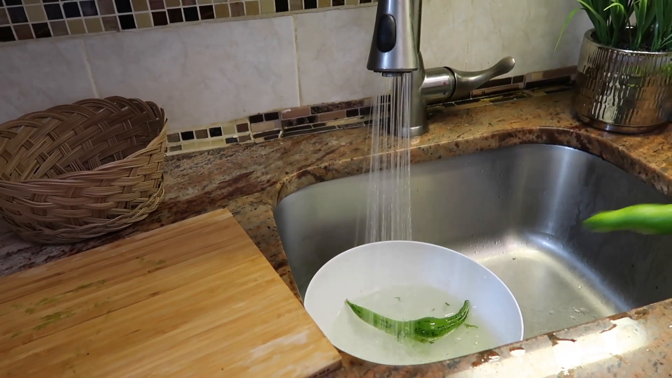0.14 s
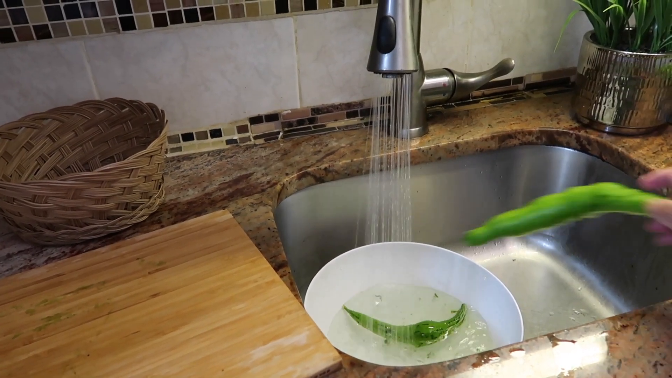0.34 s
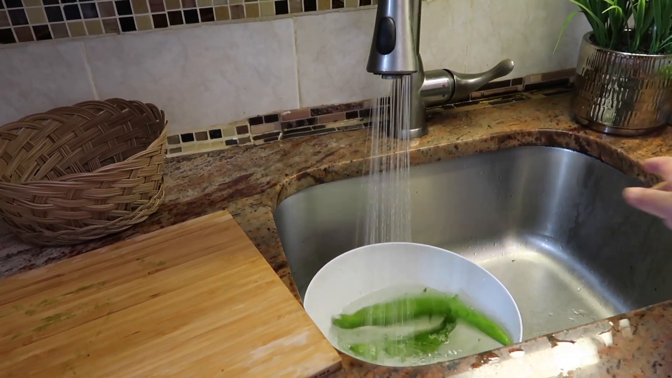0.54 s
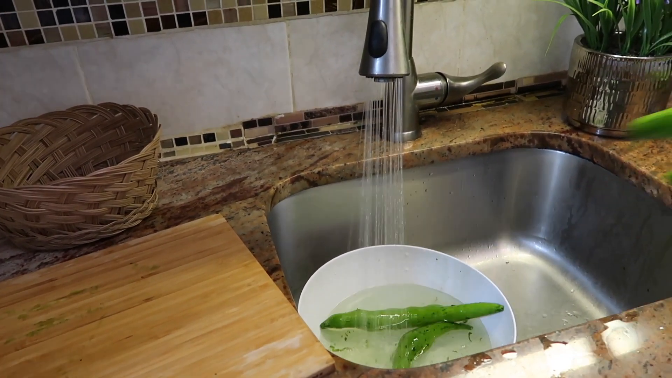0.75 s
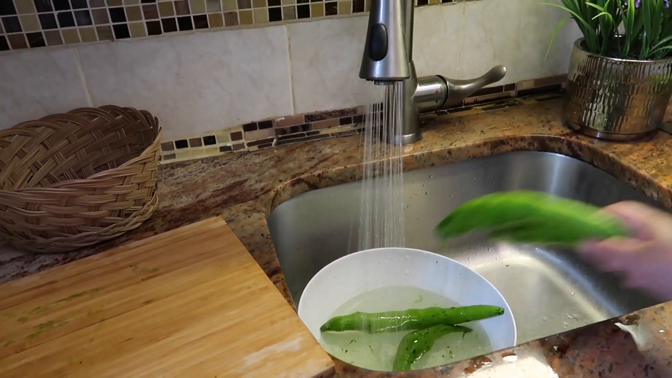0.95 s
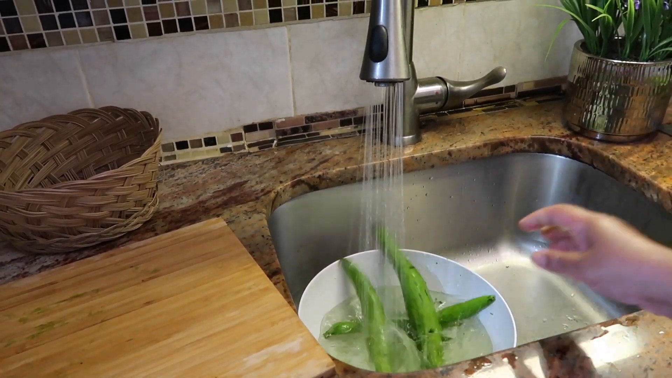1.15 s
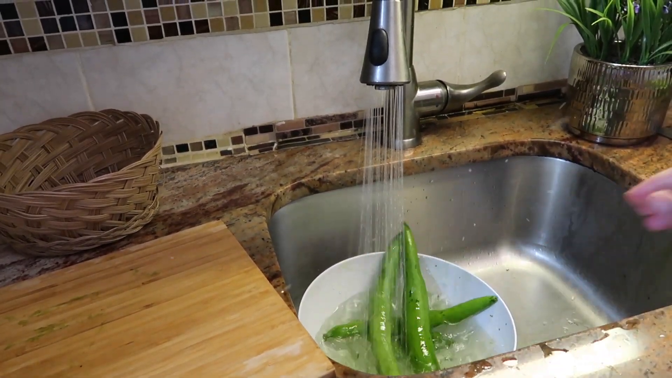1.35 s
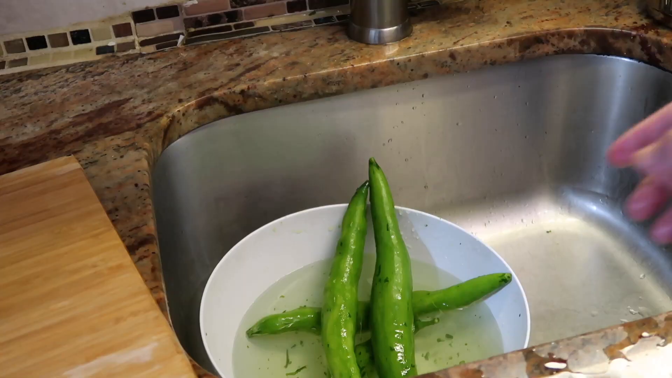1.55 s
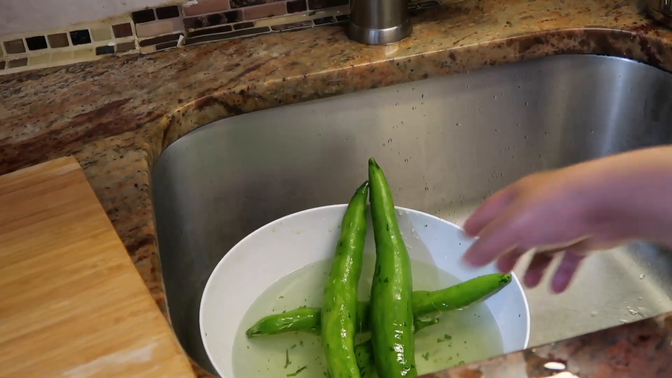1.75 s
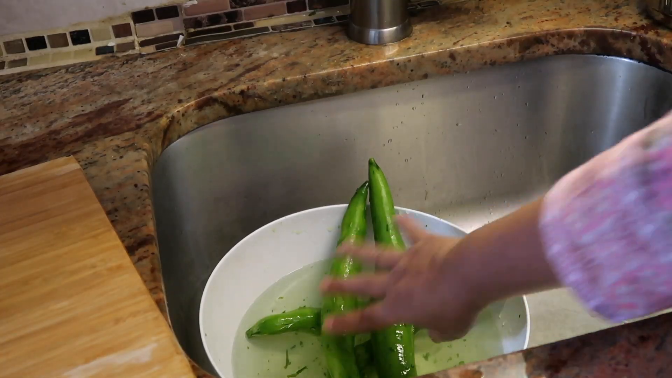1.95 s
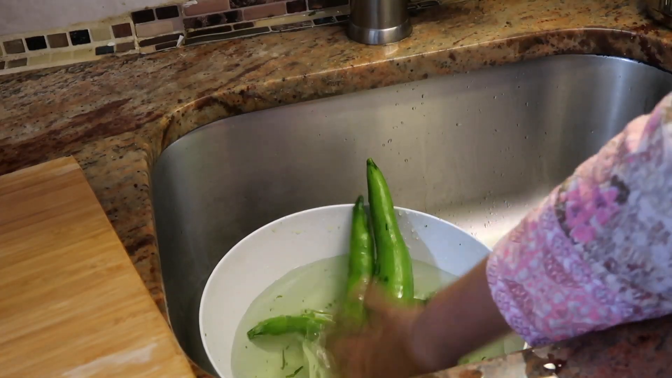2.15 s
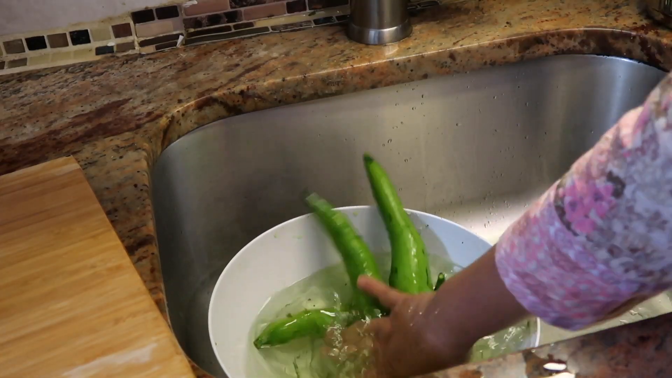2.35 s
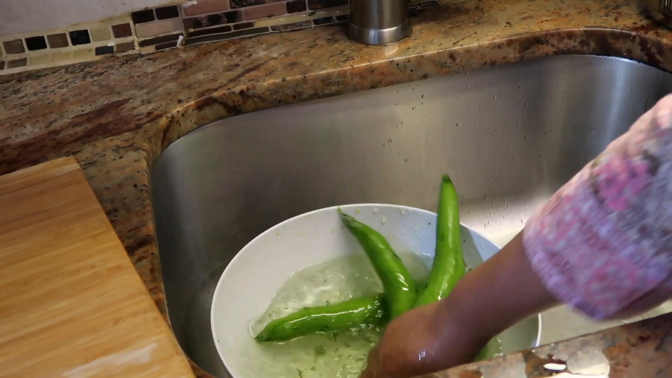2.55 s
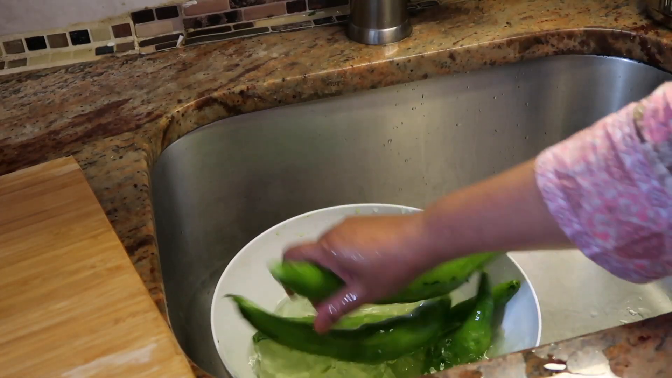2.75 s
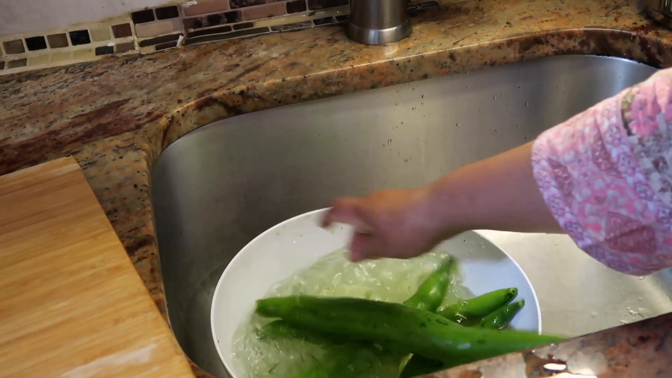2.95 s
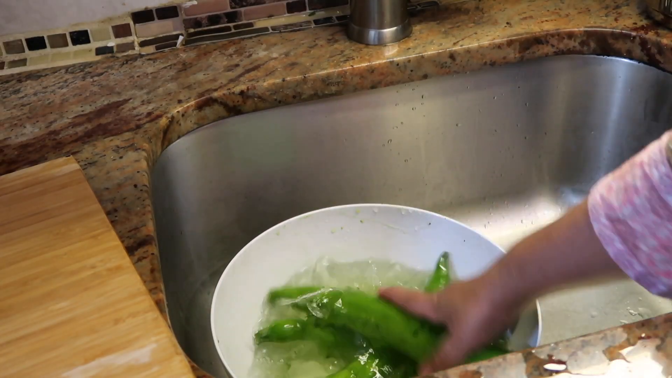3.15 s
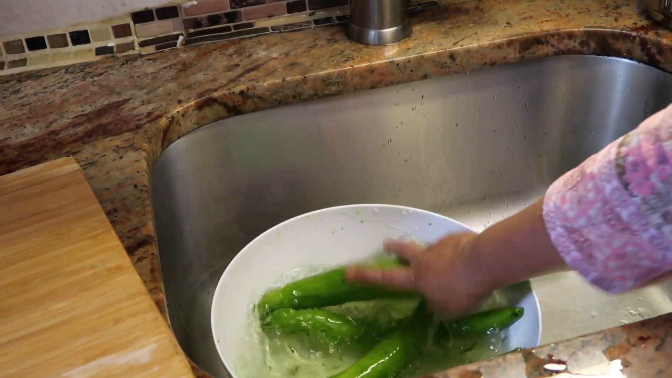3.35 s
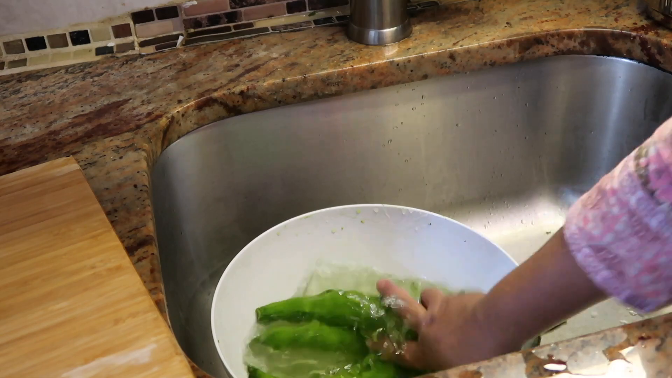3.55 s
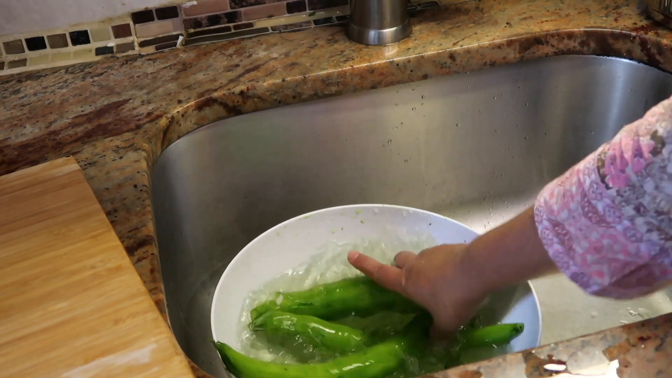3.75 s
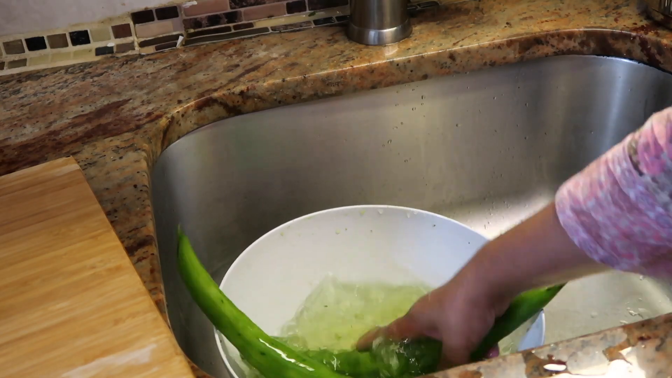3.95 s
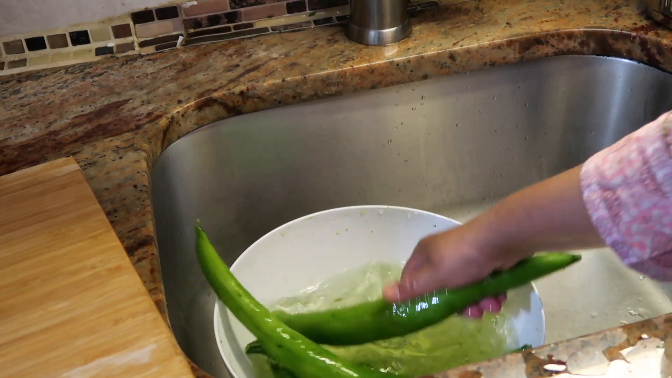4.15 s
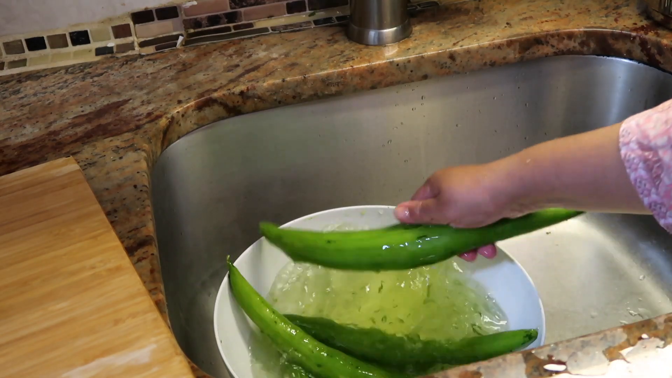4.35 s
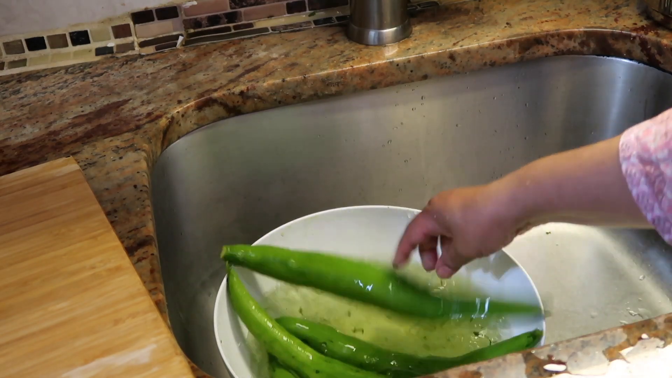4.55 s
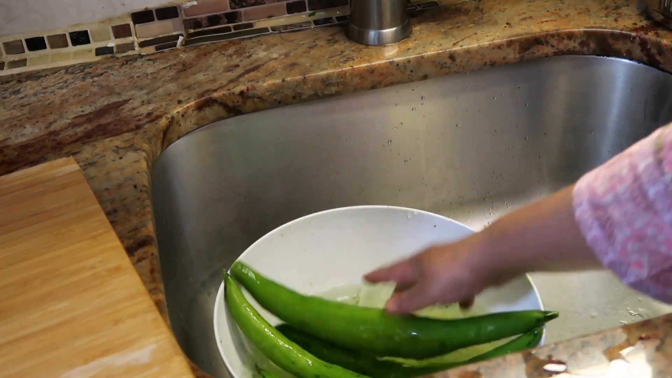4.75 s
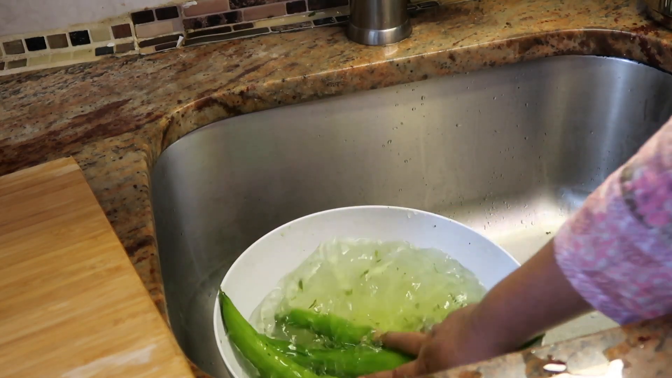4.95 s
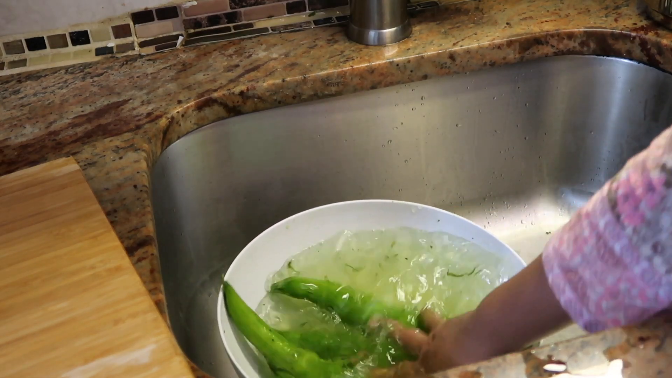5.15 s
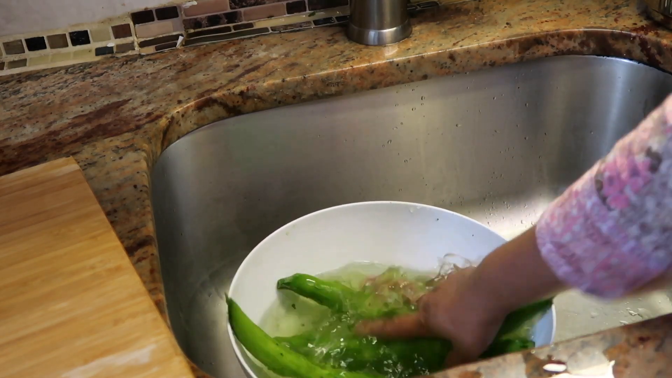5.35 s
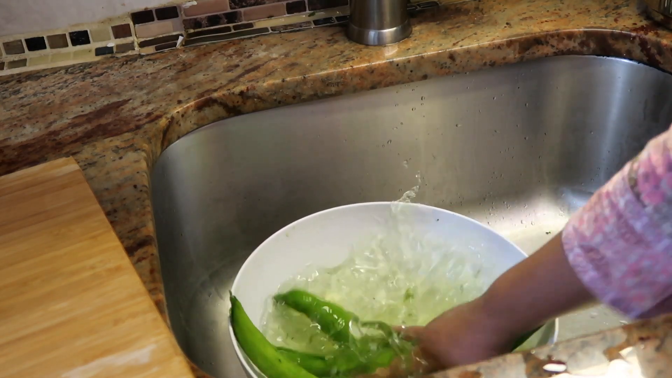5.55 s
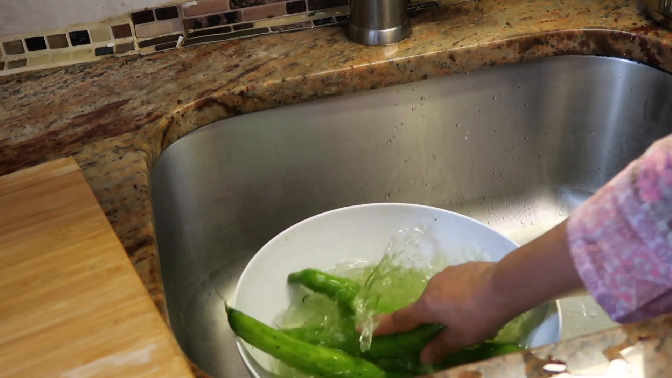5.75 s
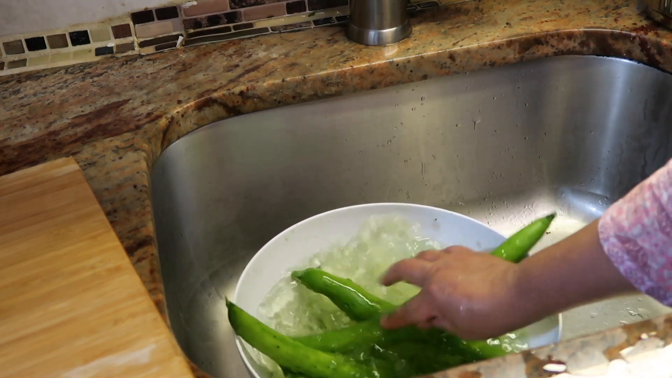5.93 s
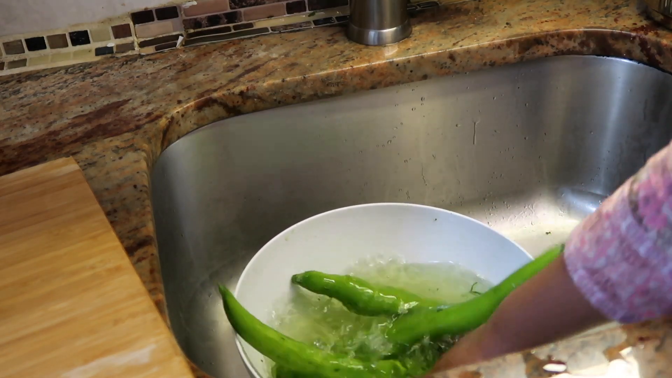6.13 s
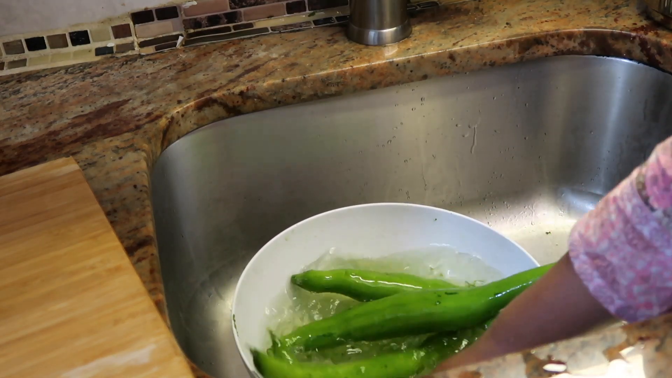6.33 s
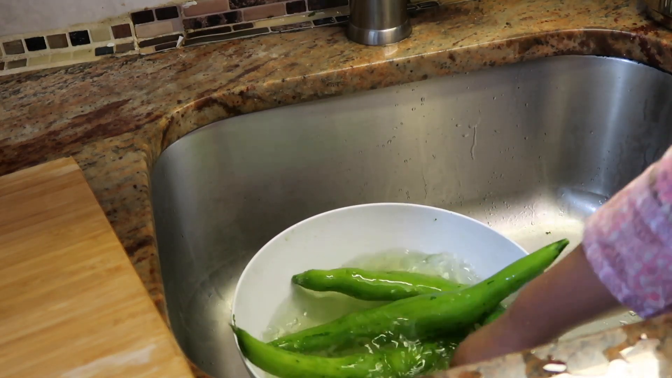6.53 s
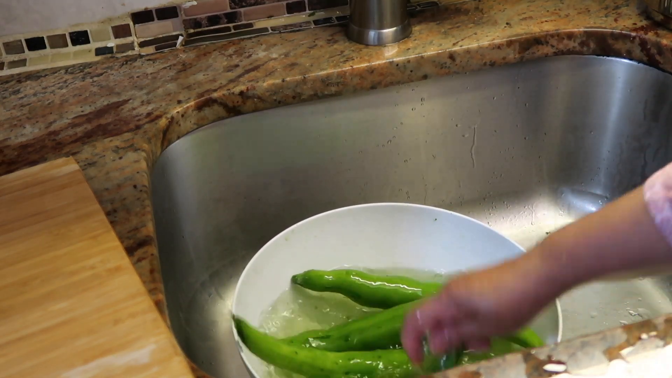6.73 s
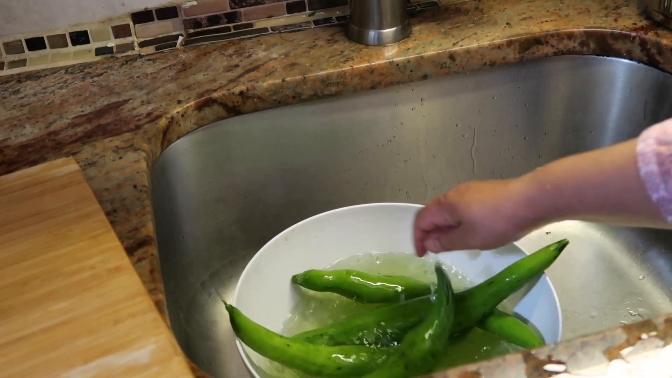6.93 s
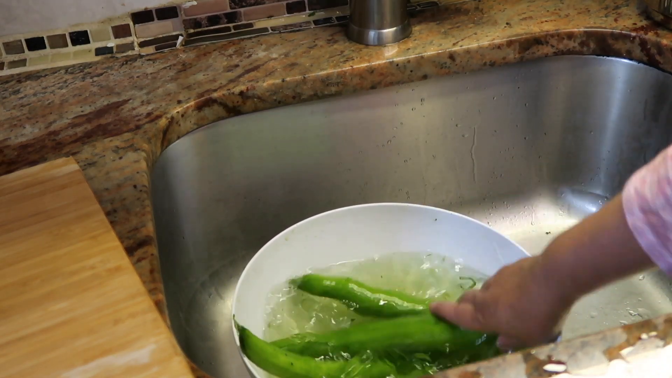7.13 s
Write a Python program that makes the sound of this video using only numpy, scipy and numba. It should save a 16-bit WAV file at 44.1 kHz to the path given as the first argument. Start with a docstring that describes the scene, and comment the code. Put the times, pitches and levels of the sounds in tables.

```python
"""At a steel kitchen sink, a tap sprays into a bowl, peppers are tossed in, then a hand swishes them about. The
spray is a hiss full of tiny drops and keeps the bowl humming; at about 1.5 s the level dips, and after that the
spray is no longer heard. Trapped air bubbles ring and rise in pitch: big ones plop, swarms of small ones gurgle
and fizz. Water slaps, the bowl and peppers bump the sink, and the basin echoes over a faint room noise. The
sound fades in, and its level dips briefly twice in the first two seconds."""
import sys
import numpy as np
from scipy import signal
from scipy.fft import rfft, irfft, next_fast_len
from scipy.io import wavfile
from scipy.ndimage import uniform_filter1d
from numba import njit

SR = 44100
rng = np.random.default_rng(int(sys.argv[2]) if len(sys.argv) > 2 else 0)


def int16_out(signal):
    """Quantize to a 16-bit WAV file."""
    q = np.round(np.clip(np.atleast_2d(signal).T, -1, 1) * 32767)
    wavfile.write(sys.argv[1], SR, q.astype(np.int16))


N = 317079

# the tones the bowl rings with: pitch_hz, level_db, ring_s (time to fade by 60 dB)
BOWL_TONES = [(404, -16.5, 0.41), (482, 12.5, 0.07), (540, 5.5, 0.055), (696, 8.5, 0.042),
              (930, 3.5, 0.041)]
FIRST_DIP_S, SPRAY_END_S = .757, 1.53


def undb(db):
    """Turn decibels into a gain to multiply by."""
    return 10 ** (np.asarray(db) / 20)


def unit(x):
    """Scale a sound to an average power of 1."""
    return x / np.sqrt(np.mean(x ** 2))


def over_time(table):
    """Join (time_s, value) points with lines, one value per sample."""
    return np.interp(np.arange(N) / SR, *np.transpose(table))


def at_pitch(table, hz):
    """Read between (pitch_hz, value) points on a scale of octaves."""
    pitches, values = np.transpose(table)
    return np.interp(np.log(hz + 1), np.log(pitches + 1), values)


def colour(x, table):
    """Shape a sound's bass and treble with (pitch_hz, level_db) points."""
    n = next_fast_len(len(x))
    gain = undb(at_pitch(table, np.fft.rfftfreq(n, 1 / SR)))
    return irfft(rfft(x, n) * gain, n)[:len(x)]


def band(x, low_hz, high_hz):
    """Keep the part of a sound between two pitches."""
    return signal.sosfilt(signal.butter(2, [low_hz, high_hz], "band", fs=SR, output="sos"), x)


def resonate(x, hz, width_hz):
    """Keep the narrow part of a sound that rings at one pitch."""
    return signal.lfilter(*signal.iirpeak(hz, hz / width_hz, SR), x)


def wander(steps_per_s):
    """A random curve that glides up and down, typically by about 1."""
    step = int(SR / steps_per_s)
    stairs = np.repeat(rng.standard_normal(N // step + 1), step)
    return unit(uniform_filter1d(stairs, step)[:N])


@njit
def bubbles(start_s, hz, cycles, rise, gain, swell):
    """Air trapped in water rings: each tone swells, dies away and rises as it nears the surface."""
    out = np.zeros(N)
    for k in range(len(start_s)):
        start, phase = int(start_s[k] * SR), 0.
        life = cycles[k] * SR / hz[k]  # samples to fade by 26 dB
        for i in range(min(int(2 * life), N - start)):
            pitch_hz = min(hz[k] * (1 + rise[k] * i / life), SR / 2.2)
            phase += 2 * np.pi * pitch_hz / SR
            fade_in = np.sin(min(phase / (5 + swell * cycles[k]), np.pi / 2)) ** 2
            out[start + i] += gain[k] * fade_in * np.exp(-3 * i / life) * np.sin(phase)
    return out


def swarm(count, low_hz, high_hz, cycles, spread_db):
    """Bubbles of mixed sizes at random times, a few much louder than the rest."""
    when, pitch, loudness, length, rise = rng.random((count, 5)).T
    hz = low_hz * (high_hz / low_hz) ** pitch
    gain = undb(-spread_db * np.log(1 - .98 * loudness))
    return unit(bubbles(when * N / SR, hz, cycles * (.5 + length), .511 * rise, gain, swell=1.5))


def kitchen_noise():
    """The room: a faint, low noise whose level wavers a little."""
    # tone of the room noise: pitch_hz, level_db
    room_tone = [(18, -84), (30, -0.5), (109, -22), (170, -14), (394, -15), (584, -18.5), (666, -19.5),
                 (962, -21), (1220, -26.5), (2120, -33), (2350, -33.5), (16000, -73.5)]
    return undb(-54 + .88 * wander(11)) * unit(colour(rng.standard_normal(N), room_tone))


def basin_reflections():
    """How the steel basin answers one click: dense echoes that die away quickly."""
    # how long the echoes last: pitch_hz, ring_s
    ring_times = [(300, 0.12), (1500, 0.19), (5000, 0.15), (14000, 0.15)]
    t, tail = np.arange(SR // 2) / SR, 0
    for hz in 200 * 2 ** np.arange(0, 6.6, .5):
        noise = band(rng.standard_normal(len(t)), hz / 1.179, hz * 1.19)
        tail = tail + noise * undb(-60 * t / at_pitch(ring_times, hz))
    tail = tail * undb(3.5 * wander(400)[:len(t)])  # echoes arrive in clumps
    return tail * np.clip(t / .0018, 0, 1) / np.sqrt(np.sum(tail ** 2))


def basin_echo(x, sway):
    """Moving water keeps changing the echoes: sway blends between two patterns of them."""
    return sum(signal.fftconvolve(x * blend(sway), basin_reflections())[:N] for blend in (np.cos, np.sin))


def stereo_spread(x):
    """Echoes reach left and right differently, mostly in the treble."""
    # strength of the left-right difference: pitch_hz, level_db
    spread = [(60, -24.5), (110, -28.5), (200, -19.5), (380, -16), (700, -19.5), (1290, -21.5), (2380, -15),
              (4400, -7), (8120, -1), (15000, 4)]
    return colour(basin_echo(x, sway=1.5 * wander(15)), spread)


def basin_air(x):
    """The air in the basin rings along, boosting some pitches."""
    # standing waves in the basin: pitch_hz, width_hz, level_db
    air_tones = [(406.7, 25, 3), (717, 280, 0), (1200, 150, -10.5), (1500, 210, -25.5), (2400, 32, -34.5),
                 (2980, 1700, -12)]
    return x + sum(undb(db + 7) * resonate(x, hz, width_hz) for hz, width_hz, db in air_tones)


def ring(tones, t, tilt_db, ring_scale):
    """A struck object's fading tones: where the blow lands tilts them, water and hand damp them."""
    hz, db, ring_s = np.transpose(tones)[:, :, None]
    gain = undb(db + tilt_db * np.log2(hz / hz.mean()) + 1.5 * rng.standard_normal(hz.shape))
    hz = hz * (1 + .02 * rng.uniform(-1, 1))  # the load shifts the pitch from blow to blow
    fade = undb(-60 * t / (ring_s * ring_scale))
    return np.sum(gain * fade * np.sin(2 * np.pi * hz * t), axis=0)


def bumps():
    """Bowl and peppers thud on the sink floor; the harder the contact, the more the bowl rings."""
    # each bump: start_s, level_db, hardness_db, tilt_db_per_octave, ring_scale (times ring_s)
    hits = [(0.576, -16.5, -11, -9, 0.57), (0.629, -13, 7, 4, 0.39), (0.645, -7.5, -16.5, -1.5, 0.88),
            (0.666, -11, 1.5, 3, 0.72), (0.695, -16.5, -7.5, 0, 1), (0.716, -24, 0, 13, 1.3),
            (1.091, -25, -10, -18, 0.7), (1.128, -21.5, -1, -1, 4.1), (1.187, -8, -23, -11.5, 1.4),
            (1.195, -16.5, 7, -8, 0.72), (1.217, -31.5, 6.5, -7.5, 1.8), (2.223, -21, -23, -7.5, 1.17),
            (2.294, -32.5, 7, 34, 0.22), (2.349, -34, -12, -10, 2.2), (2.594, -29, -12, 12, 0.83),
            (2.924, -14.5, -8.5, -9, 0.88), (3.046, -14.5, -9, -8, 0.77), (3.164, -17.5, -26, 9, 0.22),
            (3.647, -28, -32, -15, 0.56), (3.719, -39.5, 6, 19, 0.67), (3.772, -25.5, -17, 12, 0.72),
            (3.836, -32.5, -9, -2, 0.47), (4.027, -38, 0.5, 14, 0.59), (4.051, -20.5, -1.5, -8.5, 0.5),
            (4.662, -36, 16, 12, 0.43), (4.966, -18, -24, -9.5, 0.44), (5.204, -19, -9, -10.5, 0.46),
            (5.453, -36, -13, 20, 0.31), (5.577, -17.5, -34, -3, 0.28), (5.682, -35.5, -0.5, 5.5, 1.04),
            (5.986, -21.5, -32, -7.5, 0.43), (6.136, -34, -20, -15, 0.56), (6.19, -37, 6, 21, 1.4),
            (6.249, -27.5, -2.5, -3, 0.81), (6.359, -17.5, -8, 7.5, 0.98), (6.614, -42.5, -2, -1.5, 1.1),
            (7.047, -18.5, -28, -11.5, 0.47)]
    # tones of the steel sink floor: pitch_hz, level_db, ring_s
    floor_tones = [(84, -18, 0.42), (140, -1, 0.11), (145.1, -7, 0.37), (189, -9.5, 0.39), (209.2, 2, 0.23),
                   (251, -3.5, 0.16), (282, -5, 0.27), (283, -15, 0.22)]
    push_s, press_s, scuff_s, settle_s = .0019, .00476, .028, .009
    out, t = np.zeros(N + SR), np.arange(SR // 2) / SR
    push = signal.windows.hann(int(push_s * SR))
    press = signal.windows.hann(int(press_s * SR))  # soft flesh presses gradually
    for start_s, db, hardness_db, tilt_db, ring_scale in hits:
        contact = .014 * rng.standard_normal(SR // 8) * np.exp(-t[:SR // 8] / scuff_s)  # a short scuff
        contact[:len(press)] += 1.014 * press / press.sum()
        thud = np.convolve(ring(floor_tones, t, tilt_db, ring_scale), push / push.sum())[:len(t)]
        thud *= 1 - np.exp(-t / settle_s)  # the bowl settles onto the floor
        body = undb(-1.5) * thud + undb(hardness_db - 4) * ring(BOWL_TONES, t, tilt_db, ring_scale)
        start = int(start_s * SR - len(press) / 2)
        out[start:][:len(t)] += undb(db) * signal.fftconvolve(body, contact)[:len(t)]
    out = band(out[:N], 105, 6000)  # trim the deep bass and top treble from the thuds
    out[int(FIRST_DIP_S * SR):SR] = 0  # the ringing stops short at both dips in level
    out[int(SPRAY_END_S * SR):2 * SR] = 0
    return out


def drips():
    """Each drop falling back into the water traps one small, clear bubble."""
    # each drop: start_s, level_db, pitch_hz, cycles
    drops = [(2.083, -31, 2510, 15), (2.6, -30, 6960, 42), (2.651, -27, 6140, 33), (2.789, -28, 9800, 8.6),
             (2.82, -24.5, 4110, 45), (2.959, -23.5, 9300, 13), (3.03, -18, 8700, 18),
             (3.417, -31, 4130, 26), (3.464, -2.5, 8100, 1.9), (3.565, -41, 3200, 52),
             (4.026, -5.5, 10000, 3), (4.245, -32.5, 4480, 23), (4.301, -42, 3040, 43),
             (4.633, -43, 7300, 31), (4.734, -13, 11500, 8.4), (5.349, -22, 3050, 30),
             (5.36, -17.5, 3380, 31), (5.352, -19, 5800, 30), (5.478, -17, 8600, 7.9), (5.6, -47, 5000, 22),
             (5.764, -22.5, 3720, 43), (6.14, -22, 5350, 25), (6.28, -11, 5000, 19), (6.553, -47, 3440, 12),
             (6.573, -35, 1230, 16), (6.617, -17, 4650, 11), (7.035, -41, 2670, 28), (7.13, -30, 13000, 17)]
    start_s, db, hz, cycles = np.transpose(drops)
    return bubbles(start_s, hz, np.maximum(cycles, 2), np.full(len(hz), .06), undb(db), swell=1.8)


def slaps():
    """A flat slap on the water: a crack of about one cycle, too short to sound like a note."""
    # each slap: time_s, level_db, pitch_hz
    cracks = [(.633, -15, 1990), (1.196, -3.5, 2900), (1.1983, -8, 5480), (2.252, -31, 3030),
              (3.047, -18.5, 2900), (3.161, -15, 4100), (3.429, -21, 3000), (3.94, -26, 4950),
              (4.036, -42, 3000), (4.66, -17, 1450), (5.683, -16, 3020), (6.162, -21, 3000),
              (6.677, -8, 1910)]
    out, t = np.zeros(N), np.arange(-64, 65) / SR
    for time_s, db, hz in cracks:
        crack = np.exp(-(t * hz / .9) ** 2) * np.cos(2 * np.pi * hz * t)
        out[int(time_s * SR) - 64:][:len(t)] += undb(db) * crack
    return out


def bowl_hum(jets):
    """The jets keep the bowl humming: its tones and a few narrow rings join the spray."""
    # narrow rings under the jets: pitch_hz, width_hz, level_db
    hum_tones = [(309.7, 12, 3), (399.3, 7.9, 0), (489, 18, -2), (1170, 23, -8), (1545, 30, -5)]
    jets = jets + undb(-3) * sum(resonate(jets, hz, 1 / ring_s) for hz, _, ring_s in BOWL_TONES)
    return jets + sum(undb(db) * resonate(jets, hz, width_hz) for hz, width_hz, db in hum_tones)


def tap_spray():
    """Fine jets drum on the water: thousands of drop impacts and small bubbles a second."""
    # strength of the jets: time_s, level_db
    jet_levels = [(0, -30.5), (.3, -28.5), (.5, -29), (.74, -28.5), (.9, -30), (1.1, -28.5), (1.2, -31),
                  (1.3, -33.5), (1.52, -33)]
    # tone of the spray: pitch_hz, level_db
    spray_tone = [(24, -75), (40, 2.5), (110, -4.5), (180, -6.5), (260, -9), (340, -9.5), (392, -13.5),
                  (852, -18), (1150, -1.5), (1250, -3.5), (1370, -9), (1460, -0.5), (1550, -1),
                  (11600, -17.5), (14100, -24), (16000, -75)]
    # treble boost of the fine spatter: time_s, level_db
    spatter_levels = [(0, -0.1), (.4, 1), (.6, 1.1), (.8, 2), (.95, 1.8), (1.1, 0.3), (1.22, 4.3),
                      (1.26, -5), (1.33, 1), (1.42, -2), (1.5, 0.5)]
    patter = swarm(30000, 157, 15300, cycles=3.3, spread_db=3)
    patter = unit(signal.lfilter([1, -.9], [1], patter))  # favour the treble
    hiss = rng.standard_normal(N)
    burble = swarm(4000, 400.8, 2090, cycles=16, spread_db=2.5)  # larger bubbles in the pool
    jets = unit(colour(undb(-8.5) * patter + hiss, spray_tone)) + undb(-11) * burble
    gusts = undb(over_time(spatter_levels) + 1.5 * wander(60))
    jets = jets + band(jets, 3000, 15000) * (gusts - 1)
    return jets * undb(over_time(jet_levels) + wander(40))


def froth(start_s, low_hz, high_hz, cycles, db):
    """Each plop throws up 40 smaller bubbles, which take a moment to build and then thin out."""
    burst_s, gather_s, spread_db = .012, .005, 2.6
    when, pitch, loudness, length, gather = np.moveaxis(rng.random((len(start_s), 40, 5)), 2, 0)
    times = start_s - burst_s * np.log(1 - .93 * when) + gather_s * gather
    hz = np.minimum(low_hz * (high_hz / low_hz) ** pitch, 14000)
    gain = undb(db - 7.5 - spread_db * np.log(1 - .92 * loudness))
    lives = cycles * (.91 + 3.34 * length)
    rise = np.full(hz.size, .12)
    return bubbles(times.ravel(), hz.ravel(), lives.ravel(), rise, gain.ravel(), swell=1.2)


def plops():
    """Single big bubbles, each followed by froth near and above its pitch and a bright sparkle."""
    # each plop: start_s, level_db, pitch_hz, cycles, froth_db, sparkle_db (both added to level_db)
    big_bubbles = [(.632, -16, 1550, 1.54, -4, -4), (1.186, -9, 1336, 12, -7, -8.5),
                   (1.195, -5.5, 685, 0.75, -15.5, -14), (2.231, -33.5, 3400, 5, -5, -2),
                   (2.25, -18, 3800, 12, -2.5, -3), (2.3, -12.5, 930, 4.6, -9.5, -15),
                   (2.336, -20.5, 737, 6.9, 1, -7), (2.34, -16.5, 1900, 9.6, 4.5, -17),
                   (2.36, -24.5, 2420, 9.1, -4, -16.5), (2.442, -27.5, 6370, 3.8, -21, 3.5),
                   (2.546, -25, 1060, 5.3, -34, -26), (2.58, -15.5, 2670, 21, -23, -22),
                   (2.656, -23.5, 2840, 12, -5.5, -25), (2.691, -19, 4130, 12, -4.5, -21),
                   (2.795, -10.5, 1387, 17.4, -33, -29.5), (2.836, -11.5, 1579, 38, -7, -26),
                   (2.885, -26.5, 2480, 58, 3.5, -12), (2.958, -21, 2620, 42, -19, -24),
                   (3.022, -17.5, 825, 6.5, -43, -10), (3.044, -31, 888, 15, 5, -5),
                   (3.16, -2, 3440, 7, -64, -24), (3.349, -40, 860, 10, -32, -37),
                   (3.428, -17, 1387, 5.4, -0.5, -13), (3.578, -25, 3150, 47, -22.5, -7.5),
                   (3.589, -25, 1034, 8.3, -7.5, -1), (3.605, -17, 2800, 10, 0.5, -0.5),
                   (3.708, -9, 3340, 35, -27, -39.5), (3.716, -12.5, 1795, 18, -35, -36),
                   (3.823, -6, 862, 5, -37.5, -21.5), (3.836, -14.5, 937, 7.3, -30, -23),
                   (3.909, -25, 2900, 37, -12, -31.5), (3.939, -24, 2250, 54, -1, -7.5),
                   (3.98, -11, 2440, 13.5, -15.5, -33), (4.036, -14, 1510, 19, -12.5, -13.5),
                   (4.054, -5.5, 445, 3.5, -55, -21), (4.079, -9, 2260, 16, -28, -25.5),
                   (4.113, -9, 2700, 9.8, -34, -41), (4.141, -15.5, 1510, 25, -17, -27),
                   (4.2, -25, 770, 3.3, -20, -31), (4.294, -18.5, 6040, 16, -22, -35.5),
                   (4.383, -33, 8300, 40, -24, -29), (4.405, -38, 3460, 30, -2, -30),
                   (4.414, -27.5, 4440, 16, -30, -37), (4.655, -5, 1244, 10.3, -23, -45),
                   (4.915, -24.5, 2600, 11, -11, -13), (4.954, -25, 2950, 6.9, 3.5, -6),
                   (5.025, -16.5, 2770, 13, -10, -22), (5.069, -17.5, 1710, 6.8, -25, -35),
                   (5.126, -30, 437, 12.7, -30, -39), (5.145, -27, 3270, 13, -17, -21),
                   (5.178, -26.5, 434, 7.2, -31, -34), (5.185, -20.5, 2840, 7.3, -3, -13),
                   (5.251, -15, 3500, 10.5, -28, -19), (5.309, -10.5, 976, 11, -33, -40),
                   (5.315, -10, 1120, 7.9, -31, -40), (5.336, -15, 1200, 10, -18, -27),
                   (5.361, -4, 1260, 5.1, -17, -25), (5.369, -3.5, 1322, 7.2, -22, -29),
                   (5.383, -9, 1380, 3.9, -20, -27), (5.393, -25, 1450, 8.3, -10, -21),
                   (5.434, -11, 1320, 4.2, -33, -28), (5.51, -31.5, 1900, 11, 3.5, 0),
                   (5.527, -14.5, 2110, 16, -7.5, -15), (5.592, -20.5, 3180, 8.3, -4, -9),
                   (5.611, -45, 11900, 4, -17, 20), (5.681, -4, 2340, 18, -13, -37),
                   (5.694, -28.5, 7500, 6, -12, 3.5), (5.758, -22, 1460, 12, -23, -38),
                   (5.776, -5.5, 946, 9.2, -27.5, -48), (5.8, -28, 1210, 9.5, -26, -34),
                   (5.838, -12.5, 1033, 3.6, -14.5, -23), (5.881, -14.5, 3350, 35, -6.5, -30),
                   (5.962, -20.5, 1887, 33, -8.5, -29), (6.03, -18.5, 6900, 16, -17, -12.5),
                   (6.115, -23.5, 2190, 40, -35, -33), (6.158, -10, 2570, 10, -5, -9.5),
                   (6.182, -8.5, 1197, 6.3, -5.5, -14.5), (6.264, -15, 1303, 6.3, -5, -7),
                   (6.298, -22.5, 1046, 11, -12, -26), (6.43, -22, 2930, 25, -25, -32),
                   (6.436, -21.5, 2110, 42, -34, -40), (6.466, -29, 2950, 25, -30, -35),
                   (6.574, -21, 3200, 6.7, -9, -25), (6.581, -24.5, 9200, 22, -29, -25),
                   (6.586, -19, 2670, 19, -31, -34), (6.672, -10, 941, 6, -6, -38),
                   (6.672, -7, 2090, 11.7, -21, -34), (6.738, -15.5, 3350, 35, -41, -41),
                   (6.859, -23, 5460, 37, -18, -45), (6.864, -37, 6240, 35, -24, -45),
                   (7.074, -39.5, 480, 3.8, -21, -2.5)]
    start_s, db, hz, cycles, froth_db, sparkle_db = np.transpose(big_bubbles)
    out = bubbles(start_s, hz, np.maximum(cycles, 1), np.full(len(hz), .2), undb(db), swell=1.5)
    out *= undb(2.2 * np.clip(wander(300), -2, .5))  # big bubbles are not round, so they flutter
    start_s, hz = start_s[:, None], hz[:, None]
    out += froth(start_s, .794 * hz, 3.3 * hz, cycles=5, db=(db + froth_db)[:, None])
    return out + froth(start_s, 4010, 12500, cycles=9, db=(db + sparkle_db)[:, None])


def swish():
    """A hand stirs up four swarms of bubbles; each stroke favours one bubble size."""
    # each stroke: peak_s, level_db, hold_s, radius_mm, falloff_db_per_octave (away from that size)
    strokes = [(1.652, -67.5, 0.67, 2.5, 13.5), (2.646, -56, 0.11, 1.9, 8), (3.295, -69, 0.11, 3.7, 8.5),
               (6.353, -48, 0.019, 0.66, 13), (1.965, -58.5, 0.13, 1.17, 9), (2.295, -28, 0.12, 1.3, 10.5),
               (2.51, -47.5, 0.04, 1.15, 6.5), (2.919, -34, 0.0051, 1.5, 14),
               (3.05, -61.5, 0.01, 5.3, -3.5), (3.246, -58.5, 0.015, 4, 9),
               (3.458, -54.5, 0.029, 0.96, 4.5), (3.64, -47.5, 0.084, 2.04, 7),
               (3.666, -40.5, 0.011, 0.96, 8), (3.747, -34.5, 0.066, 1.3, 11.5),
               (3.873, -62, 0.0058, .66, 22), (4.044, -35.5, 0.08, 1.5, 24.5), (4.416, -74, 0.04, 4, 6.5),
               (4.707, -69, 0.04, 4, 18), (4.973, -42, 0.026, 0.66, 16), (5.063, -39, 0.02, 1.8, 21),
               (5.147, -43.5, 0.092, 0.88, 8), (5.278, -44, 0.16, 1, 9), (5.39, -57, 0.033, 1.9, 19),
               (5.57, -34.5, 0.053, 1.05, 17), (5.69, -39, 0.014, 0.44, 9), (5.751, -37.5, 0.04, 1.5, 18),
               (5.944, -45, 0.0094, 0.87, 7), (6.189, -36.5, 0.091, 1.4, 6),
               (6.276, -34.5, 0.013, 0.68, 25), (6.392, -27, 0.069, 2.03, 33.5),
               (6.567, -53, 0.039, 1.5, 7), (6.732, -36, 0.012, 1.5, 27), (7.073, -55.5, 0.066, 2.07, 14.5)]
    # middle bubble size of each swarm: radius_mm
    swarm_sizes = [4, 1.5, .66, .35]
    gurgle = swarm(2000, 480, 1400, cycles=6, spread_db=2)
    babble = swarm(3500, 1250, 3600, cycles=12, spread_db=2.5)
    fizz = swarm(4000, 3400, 7200, cycles=18, spread_db=3)
    crackle = swarm(4500, 6800, 13000, cycles=24, spread_db=3)
    rise_db_per_s, fall_db_per_s = 298, 239
    peak_s, db, hold_s, radius_mm, falloff_db = np.transpose(strokes)[:, :, None]
    t = np.arange(0, N + 64, 64) / SR
    before_s, after_s = np.maximum(peak_s - t, 0), np.maximum(t - peak_s - hold_s, 0)
    strength = undb(db - rise_db_per_s * before_s - fall_db_per_s * after_s)
    out = 0
    for size_mm, sound in zip(swarm_sizes, (gurgle, babble, fizz, crackle)):
        share = undb(-falloff_db * np.abs(np.log2(radius_mm / size_mm)))
        gain = np.sqrt(np.sum((strength * share) ** 2, axis=0))  # overlapping strokes add in power
        out = out + np.interp(np.arange(N) / SR, t, gain) * undb(1.5 * wander(30)) * sound
    return out


def scene():
    """Mix the spray, splashes, bumps and room into left and right channels."""
    # overall volume, fading in and dipping twice: time_s, level_db
    volume = [(0, -20), (.12, -21), (.16, -3), (.742, -3), (.752, -12), (.758, -24), (.775, -11), (.81, -4),
              (1.513, -3), (1.53, -36), (1.545, -20), (1.59, -3), (7.19, -3)]
    jets = bowl_hum(basin_air(tap_spray()))
    jets[int(SPRAY_END_S * SR):] = 0
    splash = basin_air(swish() + plops() + drips())
    knocks, cracks = bumps(), slaps()
    echo = basin_echo(splash + cracks, sway=2 * wander(25))
    room = kitchen_noise()
    middle = room + knocks + jets + cracks + undb(-3) * (splash + echo)
    side = stereo_spread(room + knocks + jets + splash)
    return np.array([middle + side, middle - side]) * undb(over_time(volume))


def record(dry):
    """The microphone thins the bass and cuts the highest treble."""
    bass_hz, top_hz = 97, 15500
    thin = signal.sosfilt(signal.butter(3, bass_hz, "high", fs=SR, output="sos"), dry)
    return signal.sosfilt(signal.ellip(10, .2, 80, top_hz, fs=SR, output="sos"), thin)


dry = scene()
out = record(dry)
int16_out(out)
```